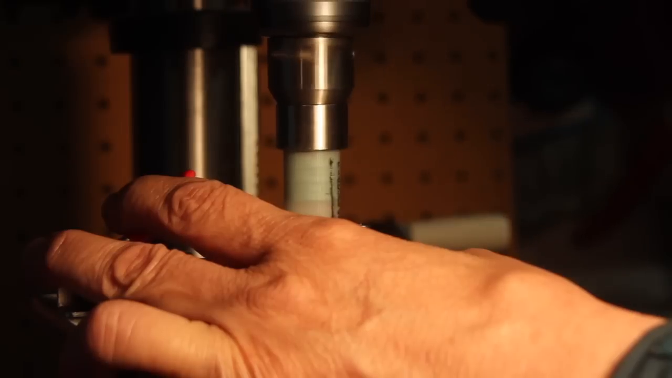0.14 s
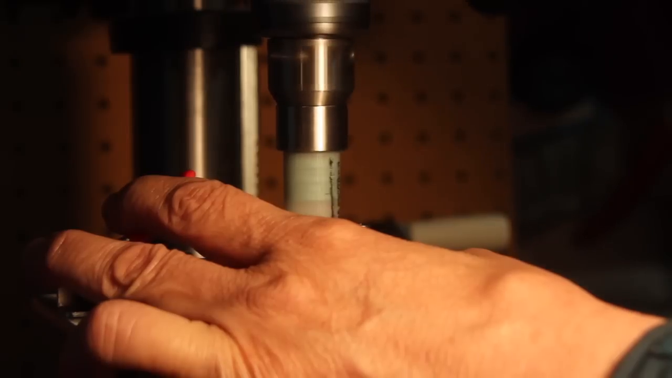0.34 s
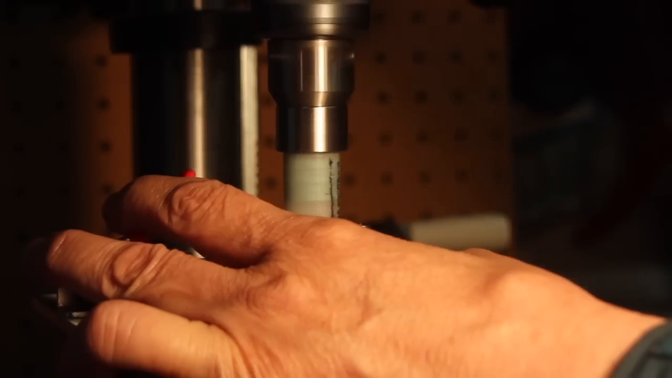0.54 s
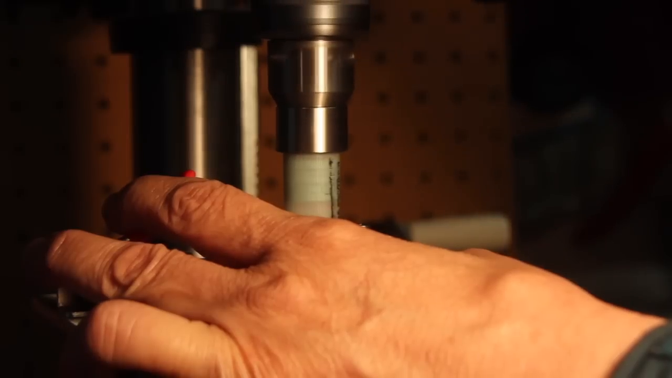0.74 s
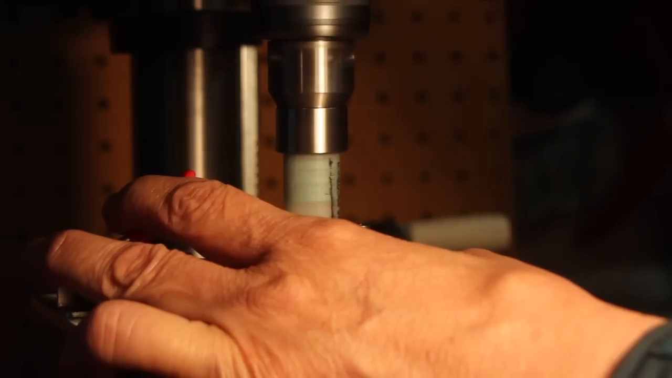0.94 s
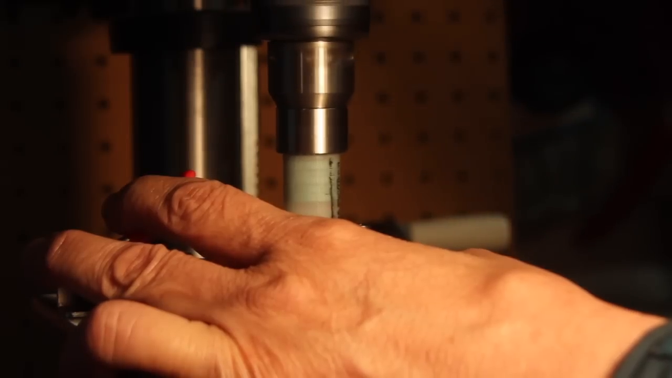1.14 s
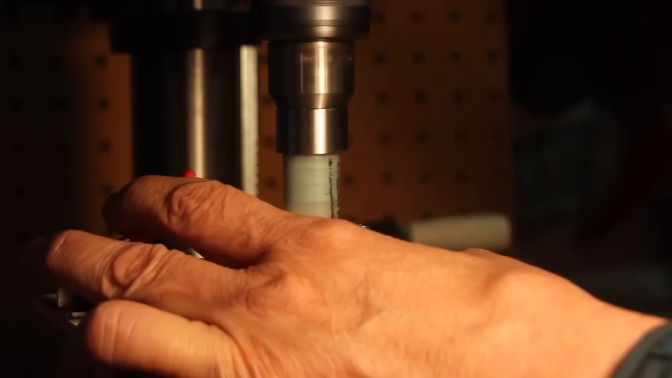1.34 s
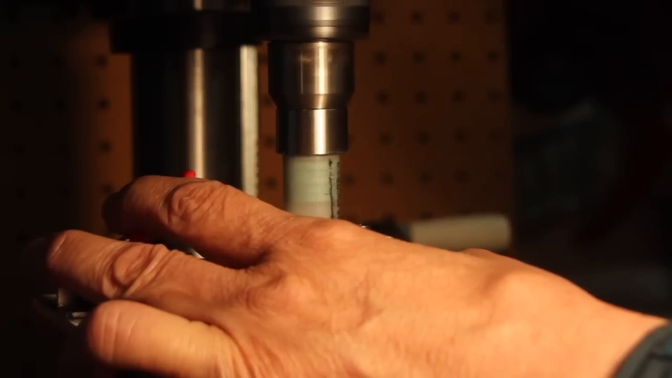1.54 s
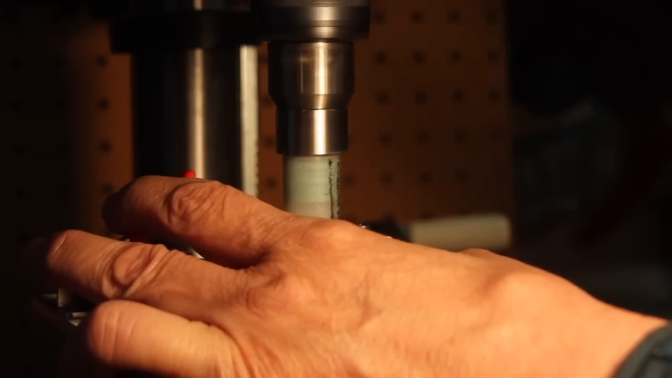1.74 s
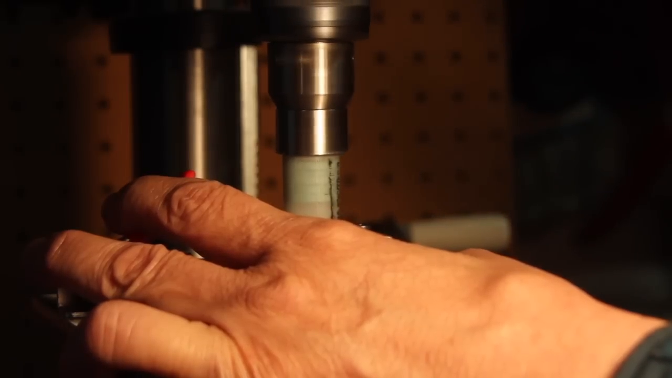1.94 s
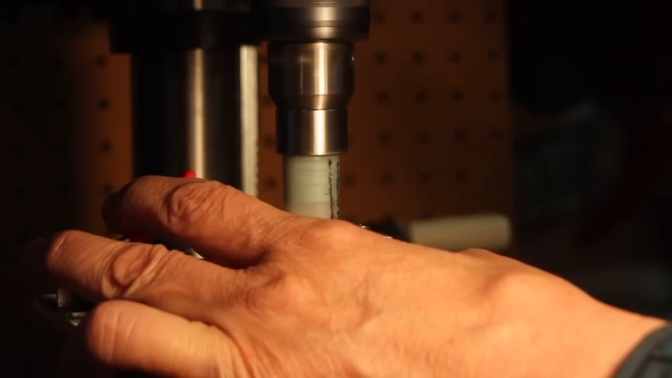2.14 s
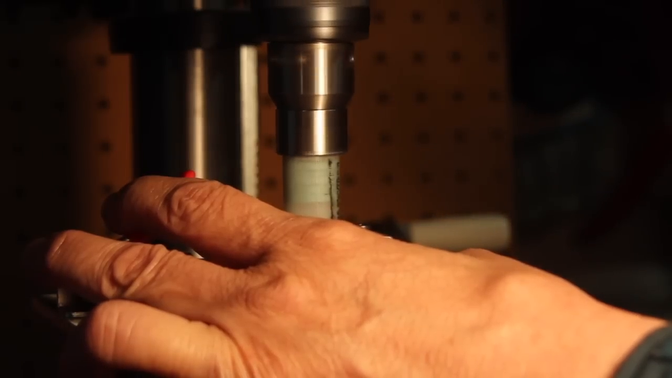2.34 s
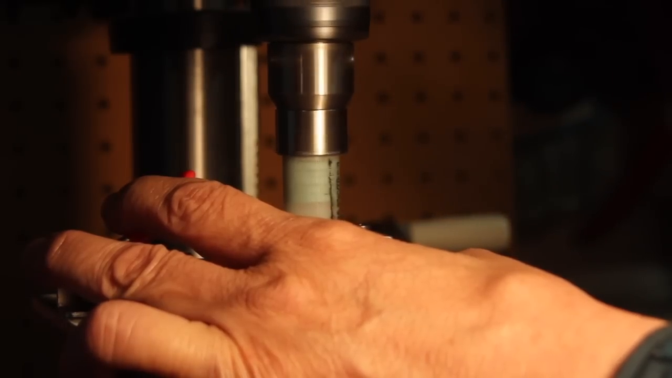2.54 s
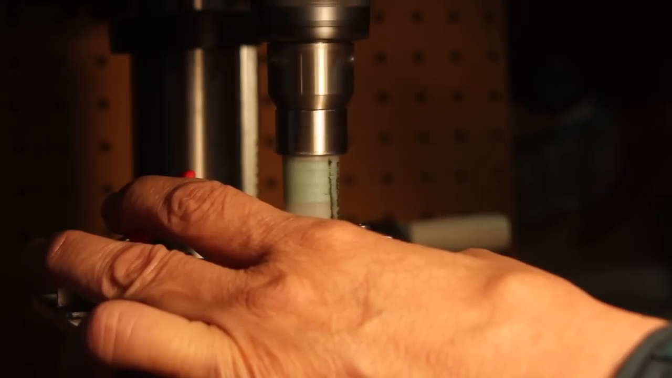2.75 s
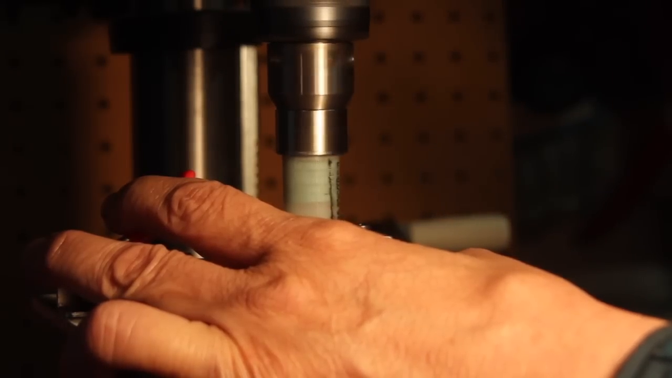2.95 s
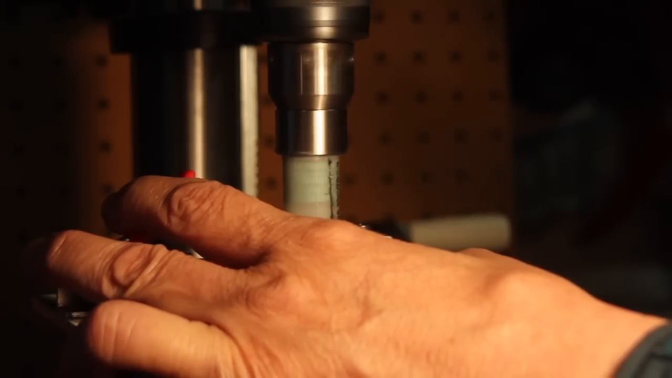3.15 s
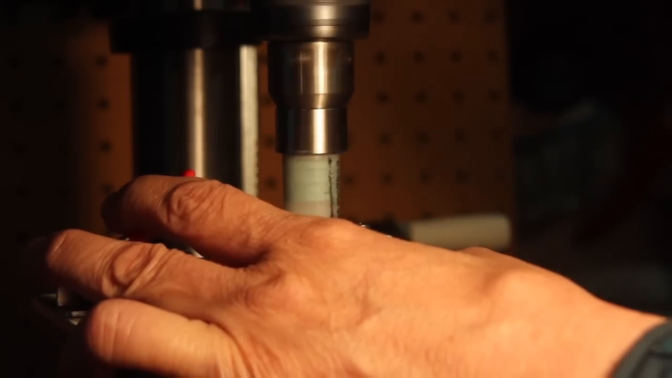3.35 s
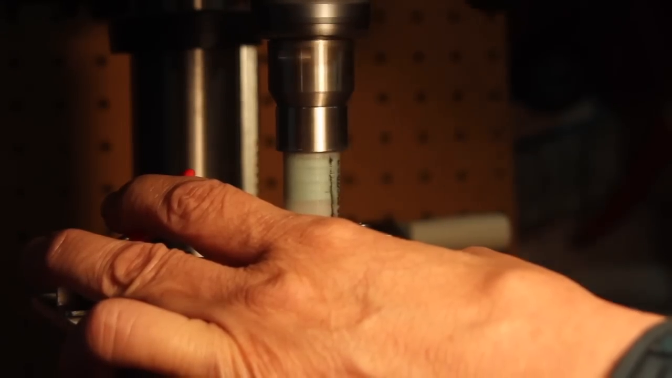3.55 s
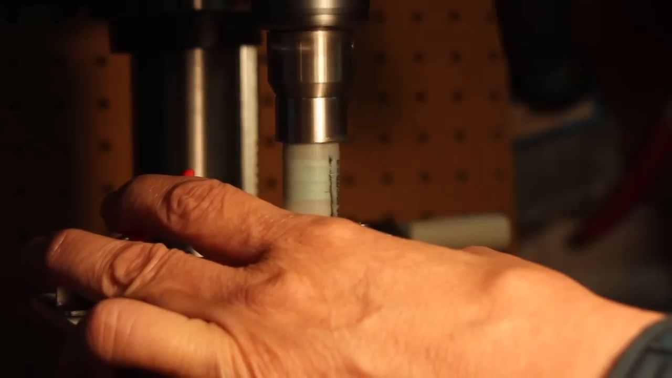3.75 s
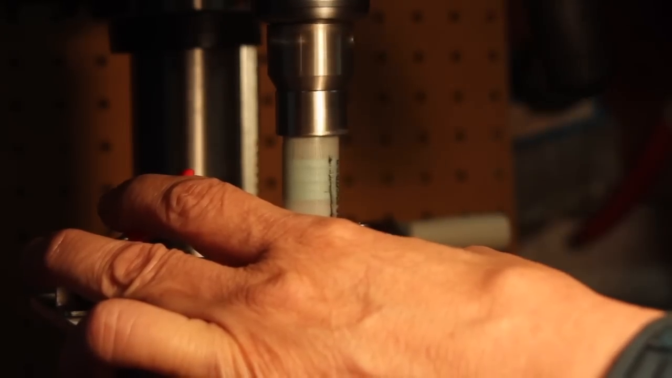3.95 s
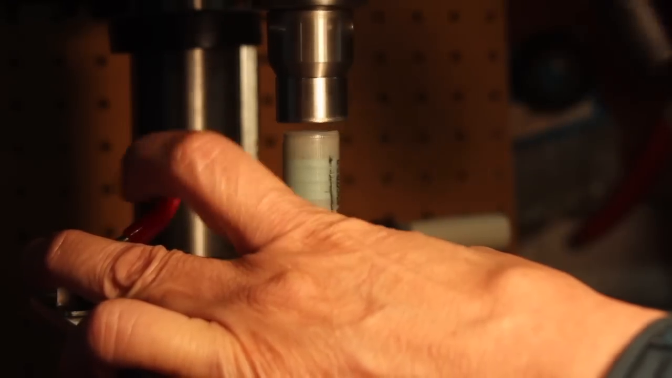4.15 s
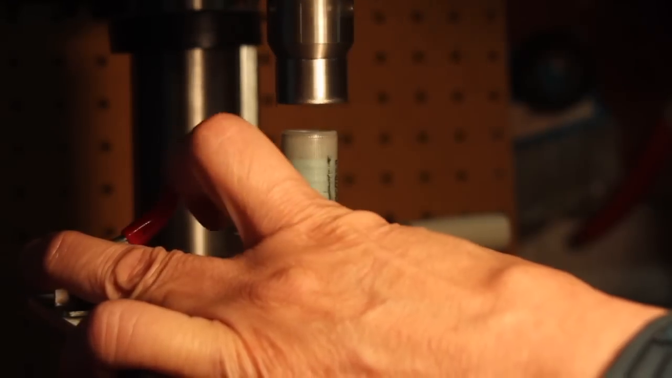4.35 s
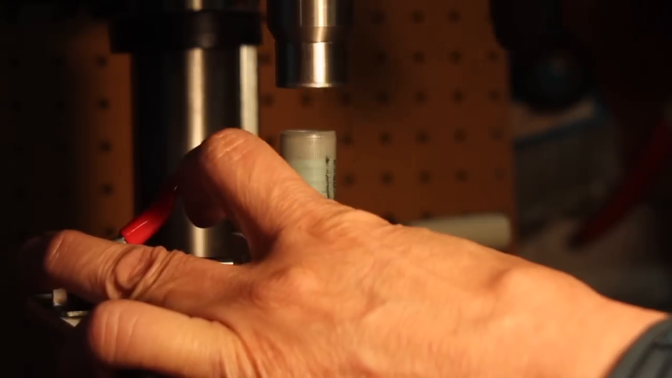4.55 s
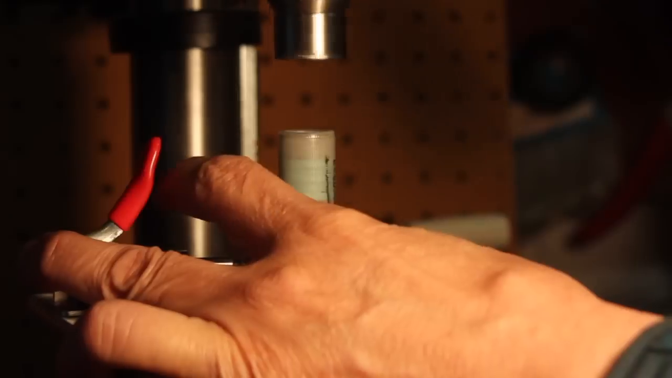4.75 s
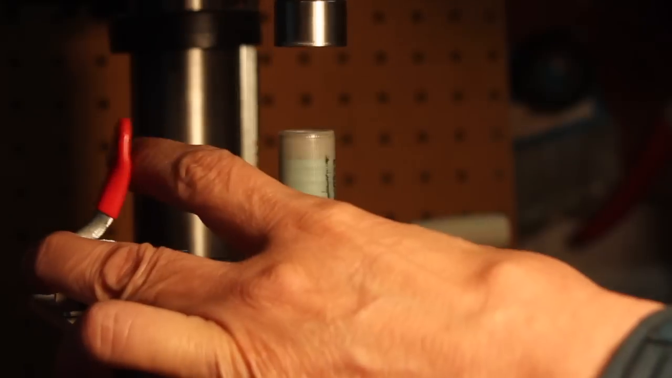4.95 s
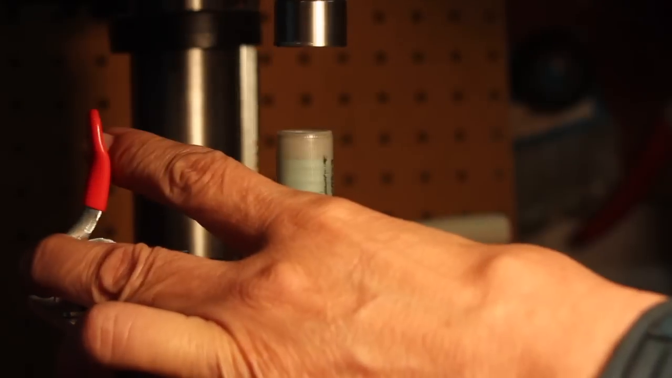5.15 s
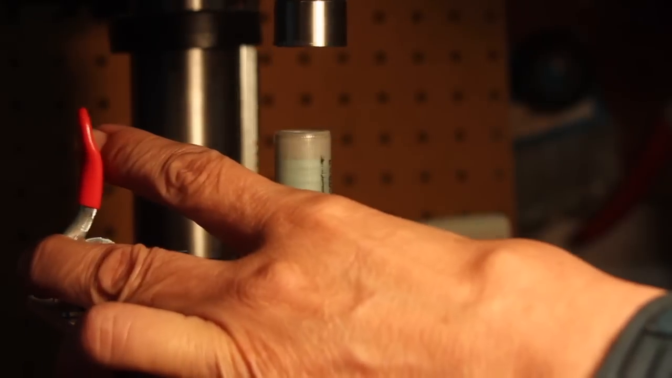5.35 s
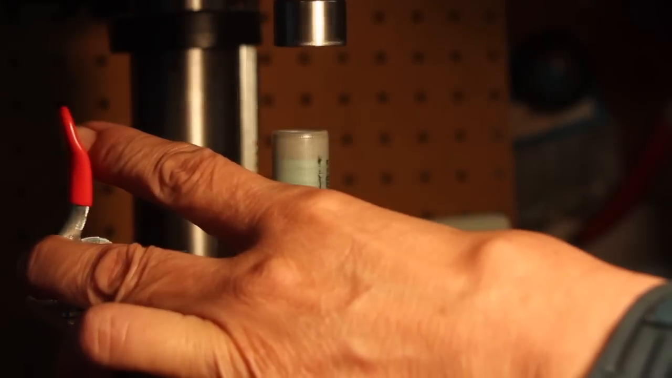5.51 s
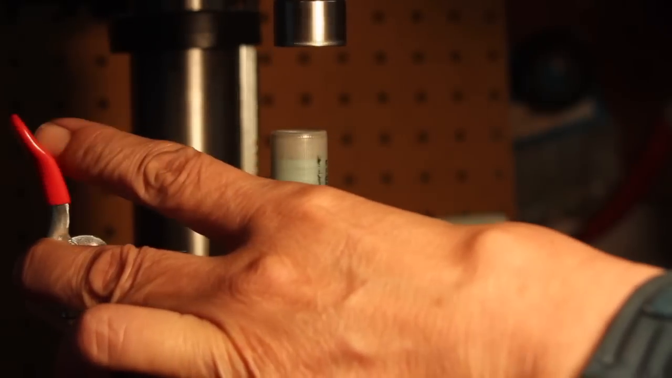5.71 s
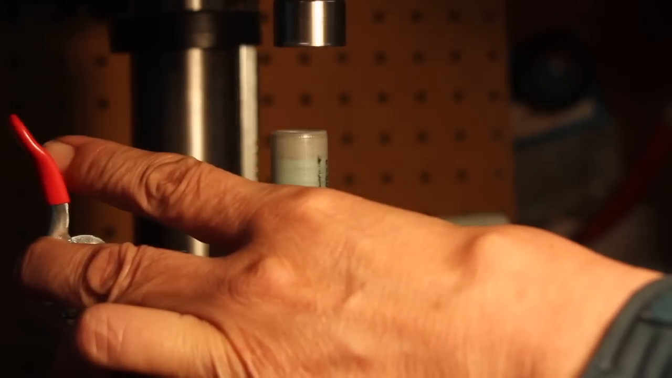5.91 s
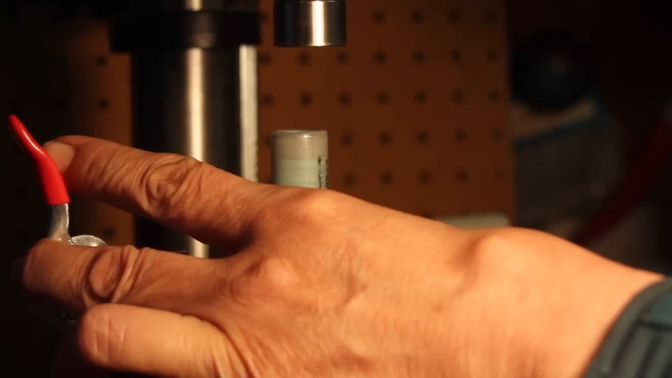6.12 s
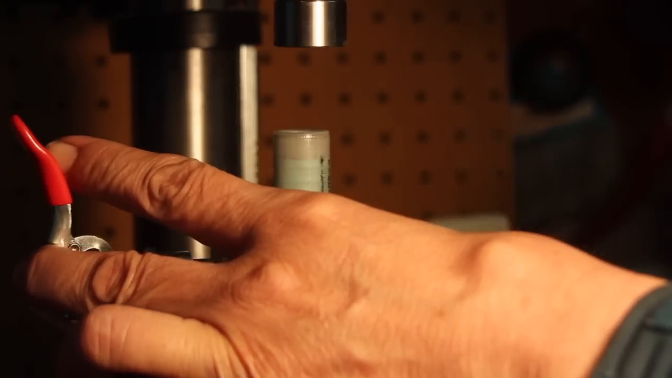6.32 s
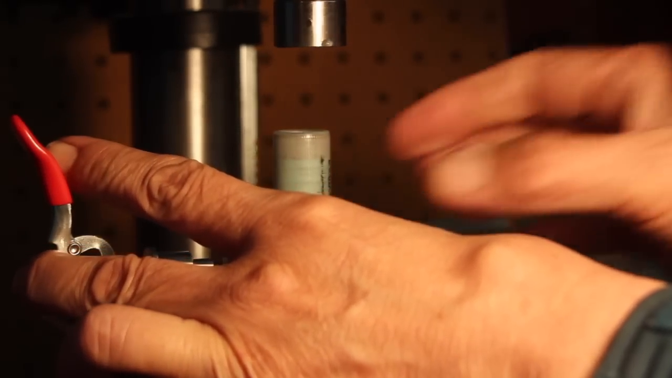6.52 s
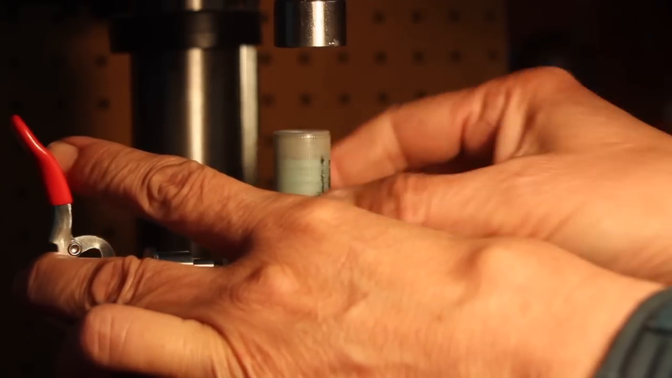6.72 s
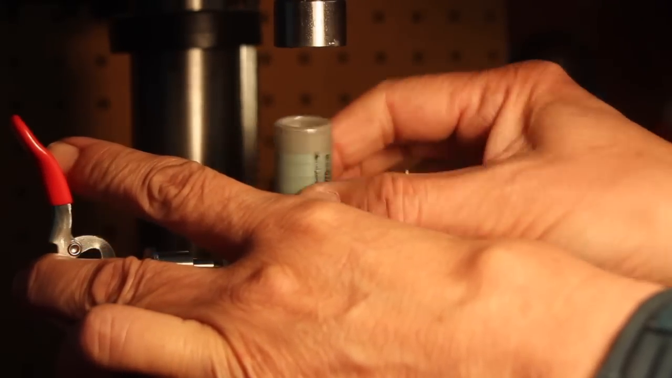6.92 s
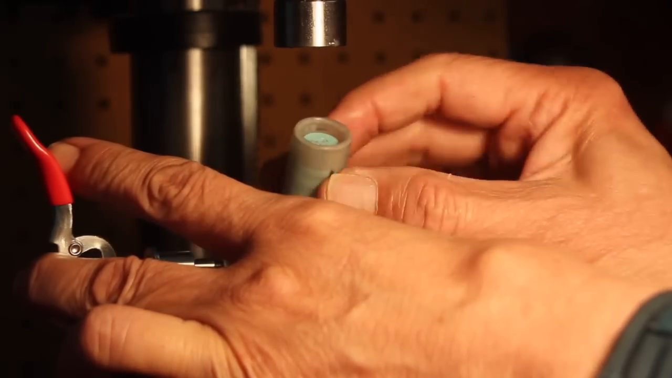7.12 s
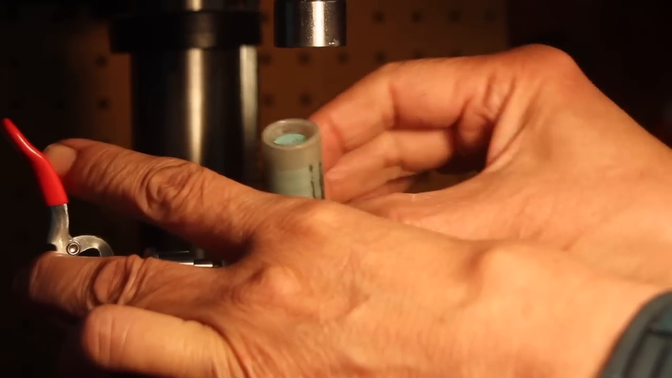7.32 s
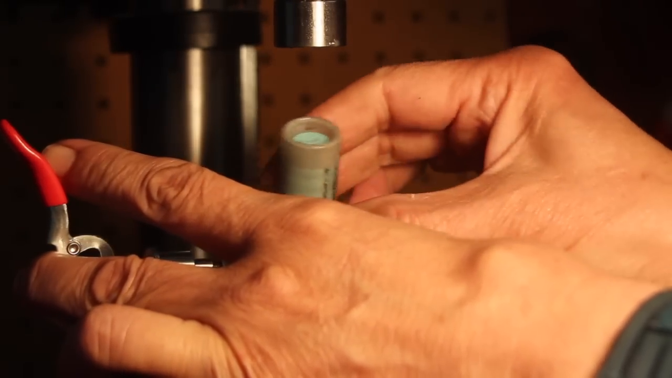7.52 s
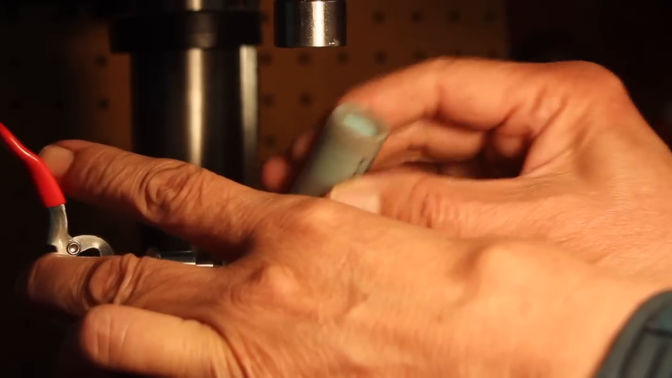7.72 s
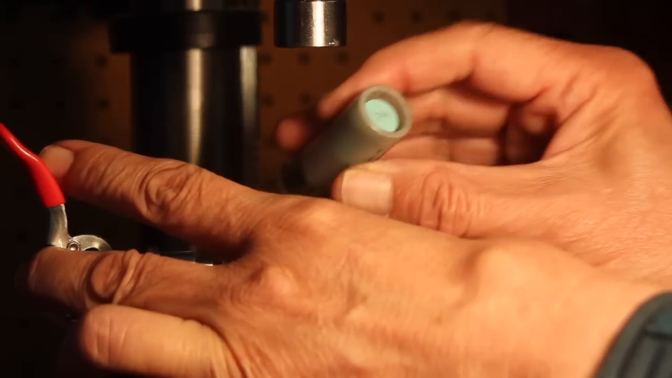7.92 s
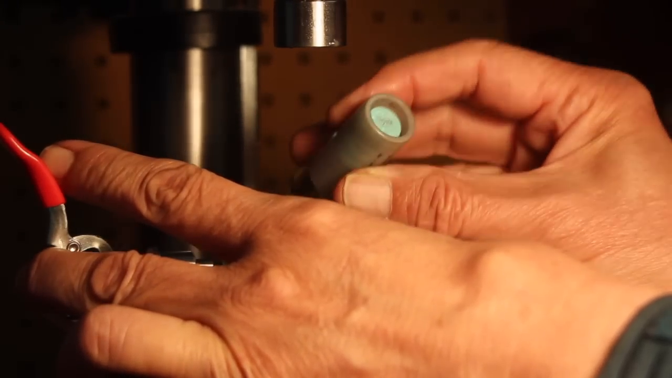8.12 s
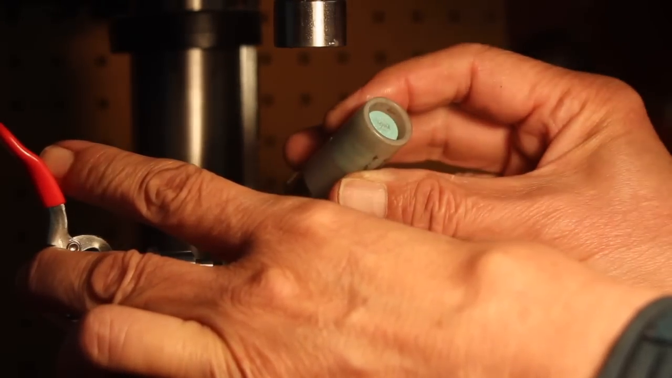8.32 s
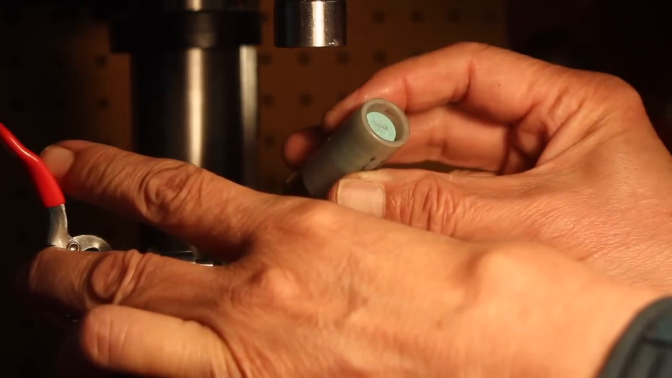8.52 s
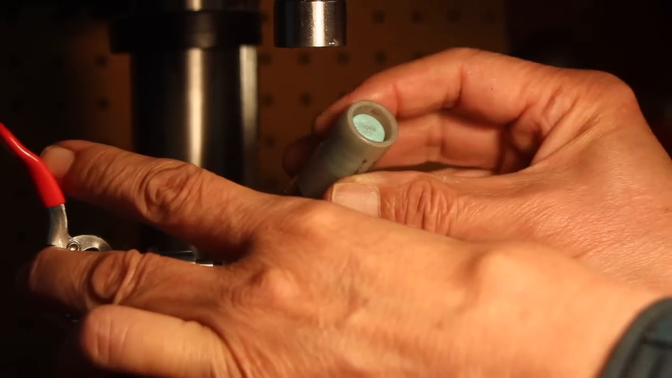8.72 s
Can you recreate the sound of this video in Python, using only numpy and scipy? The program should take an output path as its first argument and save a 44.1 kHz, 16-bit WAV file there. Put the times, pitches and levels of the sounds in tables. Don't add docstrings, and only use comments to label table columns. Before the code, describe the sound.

A small drill press motor hums and rattles steadily, snaps off, coasts down with a loud metallic clack, then a plastic shell knocks a steel clamp.

```python
import sys
import numpy as np
from scipy import signal
from scipy.fft import rfft, irfft, next_fast_len
from scipy.io import wavfile

SR = 44100
rng = np.random.default_rng(int(sys.argv[2]) if len(sys.argv) > 2 else 0)


def convert_level_to_amplitude(level_db):
    exponent = np.asarray(level_db, float) / 20
    return 10 ** exponent


def store_pcm(level_fs):
    pcm = np.round(np.clip(level_fs, -1, 1) * 32767).astype(np.int16)
    wavfile.write(sys.argv[1], SR, np.atleast_2d(pcm).T)


N = 386757
T = np.arange(N) / SR

PULL_HZ = 120.02
SPINDLE_PER_S = 10.2
OFF_S = 5.822
# start_s, load [0-1], looseness_db, spindle_lead [turns], runout_db
FEED = [(0.0, 0.34, -0.5, -0.1, 2), (.9, .45, 0.5, -.16, 1.5), (1.7, 0.64, -1, -0.079, 1.6),
        (2.2, 0.77, -0.5, -0.32, 2.5), (2.5, 0.85, -2.5, -0.48, -0.2), (2.9, 0.96, -0.5, -0.24, 1.1),
        (3.3, 0.47, 1.5, -0.15, 0.5), (3.7, 0.32, 0.5, -0.27, -0.8), (3.9, 0.18, 4, -.14, .8),
        (4.2, .1, -2, 0.19, 1), (4.8, 0.16, 1.5, 0.06, 0.5), (5.3, 0.22, -1, 0.16, 1.1),
        (5.8, .1, 0.5, -0.085, 0.3)]


def unit_rms(x):
    return x / np.sqrt(np.mean(x ** 2) + 1e-20)


def in_time(rows):
    start_s, *columns = np.transpose(rows)
    return [np.interp(T, start_s, column) for column in columns]


def drift(rate_hz):
    hop = 40
    r = np.exp(-2 * np.pi * rate_hz * hop / SR)
    noise = rng.standard_normal(N // hop + 2002)
    slow = signal.lfilter([1], [1, -2 * r, r * r], noise)[2000:]
    return np.interp(np.arange(N) / hop, np.arange(len(slow)), unit_rms(slow))


def coloured(x, spectrum):
    size = next_fast_len(N)
    hz, db = np.transpose(spectrum)
    log_hz = np.log(np.arange(size // 2 + 1) * SR / size + 1)
    gain = convert_level_to_amplitude(np.interp(log_hz, np.log(hz), db, -90, -90))
    return unit_rms(irfft(rfft(x, size) * gain, size)[:N])


def band(x, low_hz, high_hz):
    return signal.sosfilt(signal.butter(2, [low_hz, high_hz], "band", fs=SR, output="sos"), x)


def resonance(x, hz, width_hz):
    r = np.exp(-np.pi * width_hz / SR)
    poles = [1, -2 * r * np.cos(2 * np.pi * hz / SR), r * r]
    return signal.lfilter([(1 - r * r) / 2, 0, (r * r - 1) / 2], poles, x)


def ring(clicks, hz, t60_s):
    r, w = convert_level_to_amplitude(-60 / (t60_s * SR)), 2 * np.pi * hz / SR
    return signal.lfilter([0, np.sin(w)], [1, -2 * r * np.cos(w), r * r], clicks + 1e-18)


def field_decay():
    t60_s = 0.042
    return convert_level_to_amplitude(-60 * np.maximum(T - OFF_S, 0) / t60_s)


def hum():
    # order, level_db
    hum_orders = [(1, -13), (2, -9), (3, -0.5), (4, -5), (5, -10), (6, -19.5), (7, -24), (8, -27.5),
                  (9, -33), (10, -32.5)]
    # idle_db, change_at_full_load_db, wander_db
    order_load = [(-17.5, -5, 1.0), (-30.5, 5.5, 2.5), (-26, -7, 2.5)]
    load, _, lead, runout_db = in_time(FEED)
    turn_db = 0.25 * runout_db * np.cos(2 * np.pi * (SPINDLE_PER_S * T + lead - 0.25))
    main_db, second_db, fourth_db = [idle_db + load_db * load + wander_db * drift(3.4)
                                     for idle_db, load_db, wander_db in order_load]
    own_db = {2: second_db + 8.5, 4: fourth_db + 6.0}
    out = 0
    for k, db in hum_orders:
        shared_db = main_db if k > 2 else np.mean(main_db) + 1.5 * drift(1.4)
        order_db = db + own_db.get(k, shared_db) + k * turn_db + 4.5
        wobble = 0.066 * k * drift(8.7)
        phase_shift = 1.75 * k * k + 2.5 * (k == 1)
        out = out + convert_level_to_amplitude(order_db) * np.cos(2 * np.pi * k * PULL_HZ * T + phase_shift + wobble)
    return out * field_decay()


def whines():
    # pitch_hz, width_hz, level_db
    whine_tones = [(149.7, 2, -48), (450, 12, -29), (614, 14, -35), (690, 12, -43), (771, 8, -35),
                   (1131, 9, -43), (1250, 20, -42), (1331, 18, -43)]
    noise = rng.standard_normal(N)
    tones = sum(convert_level_to_amplitude(db) * unit_rms(resonance(resonance(noise, hz, width_hz), hz, width_hz))
                for hz, width_hz, db in whine_tones)
    return tones * field_decay()


def jolts_db():
    # centre_s, level_db
    jolts = [(.02, 3), (.16, -3), (1.06, -11), (1.1, 0.5), (1.27, 3), (1.59, 6.5), (1.93, -4), (2.02, 6),
             (2.11, 6), (2.23, -7), (2.6, 4), (2.82, -5), (3.17, 4.5), (3.26, 3), (3.5, 5.5), (3.84, 5),
             (4.23, 5.5), (4.26, -5), (4.38, 6), (4.46, 7), (4.58, -3.5), (4.81, 1), (4.9, -2), (5.1, 1),
             (5.4, 3.5), (5.66, 1), (5.689, 7), (5.89, 0), (5.93, 6), (6.43, 2)]
    width_s = 0.0092
    coarse_s = np.arange(0, N, 64) / SR
    bells = sum(db * np.exp(-.5 * ((coarse_s - s) / width_s) ** 2) for s, db in jolts)
    return np.interp(T, coarse_s, bells)


def powered_db():
    # level_db, change_at_lift_db, looseness share, runout share, lag [turns]
    parts_on = [
        (-21, -0.5, 0.067, 1.4, 0.23),
        (-25, -2, 0.39, 0.72, 0.075),
        (-41.5, -.5, 0.91, 1.5, 0.01),
        (-40, 5, 0.91, 1.3, 0.1),
    ]
    belt_per_s, belt_lead_turns, belt_lump_db = 12.1, -0.35, 0.8
    lift_s, lift_takes_s = 4.1, 0.23
    _, loose_db, lead, runout_db = in_time(FEED)
    lifted = np.clip((T - lift_s) / lift_takes_s + .5, 0, 1)
    lump_db = belt_lump_db * np.cos(2 * np.pi * (belt_per_s * T + belt_lead_turns))
    shared_db = loose_db + lump_db + jolts_db() + 0.29 * drift(27.0)
    levels = []
    for db, lift_db, loose, runout, lag in parts_on:
        turn_db = runout_db * np.cos(2 * np.pi * (SPINDLE_PER_S * T + lead - lag))
        levels.append(db + lift_db * lifted + loose * shared_db + runout * turn_db)
    return levels


def coasting_db():
    # free_db, starter_shut_db, share of the rundown
    parts_off = [
        (-28.5, -27.5, 1.04),
        (-49.5, -35.5, 0.64),
        (-58.5, -44, 1),
        (-51, -38.5, 0.72),
    ]
    # time_s, level_db
    rundown = [(5.85, 1), (5.97, -3.5), (6.07, 5.5), (6.19, -5), (6.25, 5), (6.35, -8.5), (6.5, -13),
               (6.7, -26), (7.2, -70)]
    shut = T > 6.21
    rundown_db = in_time(rundown)[0] + jolts_db()
    return [np.where(shut, shut_db, free_db) + share * rundown_db for free_db, shut_db, share in parts_off]


def shaken(spectrum, modes, modes_db, per_s, spread_db, pull_db, lag, patchy_db):
    since_pull = (PULL_HZ * T - lag) % 1
    pull = convert_level_to_amplitude(pull_db * (T < OFF_S) * (np.exp(-since_pull / .35) - .33))
    sizes = convert_level_to_amplitude(spread_db * np.minimum(rng.exponential(1, N), 5)) * rng.standard_normal(N)
    contacts = unit_rms(sizes * (rng.random(N) < per_s / SR)) + .5 * rng.standard_normal(N)
    force = contacts * pull * convert_level_to_amplitude(patchy_db * drift(39))
    rings = sum(convert_level_to_amplitude(db + 1.3 * patchy_db * drift(2.5)) * resonance(force, hz, width_hz)
                for hz, width_hz, db in modes)
    return unit_rms(coloured(force, spectrum) + convert_level_to_amplitude(modes_db) * unit_rms(rings))


def machine():
    # frequency_hz, density_db [per Hz]
    rumble_colour = [(25, -56), (60, -50), (100, -15), (160, -13), (210, -4.5), (260, -1), (520, -1),
                     (650, -7.5), (900, -17), (1200, -20)]
    rattle_colour = [(470, -39), (800, -0.5), (896, -2), (1140, -3), (1470, 0), (1860, -1.5), (2030, -6.5),
                     (2290, -6), (2900, -58), (3770, -19), (6380, -120)]
    chatter_colour = [(2940, -7), (5000, -10.5), (6390, -7), (10200, -4), (13300, -12.5), (15800, -71)]
    jingle_colour = [(1590, -0.5), (2700, -2), (3090, -9.5), (4600, -10), (5400, -13.5), (7020, -18),
                     (11900, -120)]
    # frequency_hz, width_hz, level_db
    table_modes = [(161, 18, -7), (276, 46, -2.5), (290.6, 8.2, -23), (403, 100, 0), (513, 12, 2)]
    stand_modes = [(214, 32, -7.5), (259, 22, 1.5), (328, 16, -0.5), (477, 15, 4), (525, 18, -5),
                   (620, 13, -6), (865, 38, -14)]
    casing_modes = [(1435, 35, -2), (1515, 40, 0), (1650, 60, -3), (1815, 45, 2), (1870, 40, -2),
                    (1940, 35, -4), (2090, 30, -4), (2255, 45, -2), (2400, 50, -7)]
    quill_modes = [(6080, 150, -2), (7490, 110, -3), (8330, 90, 0), (9250, 250, 0), (10300, 360, 2),
                   (11400, 300, 1), (13100, 300, -5)]
    chuck_modes = [(2800, 60, -2), (3395, 60, 0), (4220, 70, -4), (4590, 55, -5), (5050, 60, -8)]

    coast = np.clip((T - OFF_S) / .03, 0, 1)
    rumble_db, rattle_db, chatter_db, jingle_db = [(1 - coast) * on + coast * off
                                                   for on, off in zip(powered_db(), coasting_db())]
    belt = shaken(rumble_colour, table_modes, -7.0, 1500, 2.2, 3.0, .25, patchy_db=1.4)
    stand = shaken(rumble_colour[2:], stand_modes, 4.0, 2500, 1.2, 0, 0, patchy_db=1.5)
    casing = shaken(rattle_colour, casing_modes, -2.0, 4000, 2.4, 6.0, .04, patchy_db=1.2)
    quill = shaken(chatter_colour, quill_modes, -7.0, 6000, 2.0, 8.0, .03, patchy_db=1.5)
    chuck = shaken(jingle_colour, chuck_modes, -10.5, 4000, 1.6, 3.0, .04, patchy_db=1.6)
    rumble = np.sqrt(1 - coast) * belt + np.sqrt(coast) * band(stand, 75, 1100)
    parts = convert_level_to_amplitude(rumble_db) * rumble + convert_level_to_amplitude(rattle_db) * casing
    parts = parts + convert_level_to_amplitude(chatter_db) * quill + convert_level_to_amplitude(jingle_db) * chuck
    parts = signal.sosfilt(signal.butter(4, 13900, fs=SR, output="sos"), parts)
    air_db = chatter_db - 13.0 - 14.0 * in_time(FEED)[0]
    return parts + convert_level_to_amplitude(air_db) * unit_rms(band(rng.standard_normal(N), 11500, 15000))


def strikes(events, crack_hz, modes, modes_db, rise_s, breadth, reach_db):
    out, t = np.zeros(N + SR), np.arange(SR // 3) / SR
    contact = np.exp(-t / 0.00004) * (t < .001)
    rise = 1 - np.exp(-t / rise_s)
    for start_s, peak_db, hz, crack_db, t60_s in events:
        noise = rng.standard_normal((2, len(t)))
        fade = convert_level_to_amplitude(-60 * t / max(t60_s, .01)) * rise * (0.7 + 0.66 * np.exp(-t / 0.0055))
        body = resonance(resonance(noise[0], hz, breadth * hz), hz, 1.2 * breadth * hz)
        crack = resonance(resonance(noise[1], crack_hz, 0.7 * crack_hz), crack_hz, crack_hz)
        rings = 0
        for mode_hz, db, tail_s in modes:
            mode_db = db - reach_db * abs(np.log2(mode_hz / hz)) + 2.5 * rng.standard_normal()
            rings = rings + convert_level_to_amplitude(mode_db) * ring(contact, mode_hz, tail_s) * rise
        blow = unit_rms(body) * fade + unit_rms(crack) * fade * convert_level_to_amplitude(crack_db)
        blow = blow + convert_level_to_amplitude(modes_db) * rings / np.max(np.abs(rings))
        at = round(start_s * SR)
        out[at:at + len(t)] += convert_level_to_amplitude(peak_db - 6.5) * blow
    return out[:N]


def starter_strikes():
    # frequency_hz, level_db, t60_s
    starter_modes = [(533, -12, .15), (1486, -5, .045), (1787, -5, .05), (2089, -1, .045), (2283, -1, .045),
                     (2482, -2, .045), (2650, -3, .04), (3698, -12, .05), (4080, -10, .05),
                     (5740, -16, .05)]
    # start_s, peak_db, pitch_hz, crack_db [re body], t60_s
    switches = [
        (5.8137, -7.5, 2600, -7.5, 0.034),
        (6.1985, -32, 3000, 7, 0.054),
    ]
    clack = [(6.207, -11, 2500, -5, 0.039), (6.2115, 0, 2180, -9, 0.033), (6.2165, -4.5, 2140, 2, 0.029),
             (6.222, -5.5, 2040, -8, 0.054), (6.228, -19, 2200, -17, .025)]
    turns = [(5.9114, -40, 1260, -22, 0.04), (5.9474, -32, 1770, -22, 0.04), (5.9808, -25, 1530, -22, 0.04),
             (6.0104, -27, 1410, -22, 0.04), (6.04, -23, 1500, -22, 0.067), (6.0694, -24, 1950, -25, 0.04),
             (6.1412, -23, 1500, -22, 0.045)]
    ticks = [(6.2687, -18, 2490, -15, 0.035), (6.2844, -24, 2330, -9, 0.041),
             (6.314, -19.5, 2090, -11, 0.083), (6.3726, -19, 1770, -23, 0.1),
             (6.3985, -20, 2400, -7, 0.075), (6.4557, -23.5, 1960, -10, 0.036)]
    return (strikes(switches, 10000, starter_modes, 1.5, 0.00066, 0.65, 9.0)
            + strikes(clack, 7000, starter_modes, 0.56, 0.0044, 0.57, 3.5)
            + strikes(turns, 4000, starter_modes, -5.0, 0.0037, 0.39, 11.0)
            + strikes(ticks, 3750, starter_modes, 3.1, 0.0009, 0.5, 3.7))


def clamp_strikes():
    # frequency_hz, level_db, t60_s
    clamp_modes = [(604, -1, 0.23), (877, 3, 0.11), (1124, -1, 0.12), (1220, 0, 0.098), (1470, 1, 0.061),
                   (1557, 5, 0.12), (1870, 0, 0.077), (2114, 2, 0.07), (2600, 4, .05), (2900, 7, 0.061),
                   (3130, 8, .05), (3490, 0, .04), (5700, -6, .04), (7400, 7, .06)]
    # start_s, peak_db, pitch_hz, crack_db [re body], t60_s
    lever = [
        (4.7485, -14.5, 7200, -25, 0.077),
    ]
    handling = [(7.091, -23, 2060, -0.5, 0.1), (7.677, -26.5, 2000, 4.5, 0.11),
                (7.936, -30.5, 2830, -2, 0.074), (7.939, -39, 1300, -30, .1)]
    taps = [(7.261, -40, 1400, -30, 0.14), (7.758, -29.5, 1450, -6, 0.097), (7.823, -38, 1500, -16, 0.15),
            (7.828, -42, 600, -40, 0.25), (8.323, -43, 1350, -32, 0.12), (8.396, -43, 1590, -30, 0.11),
            (8.636, -54, 2400, -12, .05), (8.679, -56, 1100, -20, .08)]
    return (strikes(lever, 4500, clamp_modes, -2.0, 0.0012, 0.5, 9.7)
            + strikes(handling, 7100, clamp_modes, 5.9, .0003, 0.79, 8.9)
            + strikes(taps, 3300, clamp_modes, 6.0, 0.0019, 0.67, 8.7))


def thud():
    click = np.zeros(N)
    click[round(6.4255 * SR)] = convert_level_to_amplitude(-13)
    return band(ring(click, hz=320, t60_s=.02), 90, 1300)


def rub():
    # time_s, level_db
    rub_levels = [(6.2, -75), (6.24, -50), (6.55, -45), (6.72, -50), (6.9, -70)]
    hiss = band(rng.standard_normal(N), 350, 10500)
    level_db = in_time([(6.1, -120), *rub_levels, (7.1, -120)])[0]
    return convert_level_to_amplitude(level_db) * unit_rms(hiss)


def walls(x):
    t60_s, level_db = 0.15, -19.5
    t = np.arange(SR // 2) / SR
    tail = rng.standard_normal(len(t)) * convert_level_to_amplitude(-60 * t / t60_s) * (t > .006)
    tail = signal.lfilter([.4], [1, -.6], tail)
    return convert_level_to_amplitude(level_db) * signal.fftconvolve(x, tail / np.sqrt(np.sum(tail ** 2)))[:N]


def shop():
    # frequency_hz, density_db [per Hz]
    air_colour = [(15, -52), (25, -41), (80, -14), (152, -14.5), (222, -10.5), (371, -13), (473, -14.5),
                  (572, -16), (672, -16), (791, -15.5), (2150, -22.5), (2460, -22.5), (15800, -26)]
    whine = convert_level_to_amplitude(-58 + 0.99 * drift(6)) * np.sin(2 * np.pi * 480.1 * T)
    recover_from_s, recover_takes_s = 6.2, 0.54
    duck_db = -1.5 * np.clip(1 - (T - recover_from_s) / recover_takes_s, 0, 1)
    return convert_level_to_amplitude(duck_db) * (convert_level_to_amplitude(-52.5) * coloured(rng.standard_normal(N), air_colour) + whine)


def scene():
    hits = band(starter_strikes() + clamp_strikes() + thud(), 120, 14000)
    return (hum() + whines() + machine() + rub() + hits + walls(hits) + shop())[None]


def low_pass(x):
    return signal.sosfilt(signal.butter(12, 15830, fs=SR, output="sos"), x)


def record(dry):
    mix = 0.96 * np.tanh(dry / 0.91)
    return low_pass(mix)


dry = scene()
out = record(dry)
store_pcm(out)
```